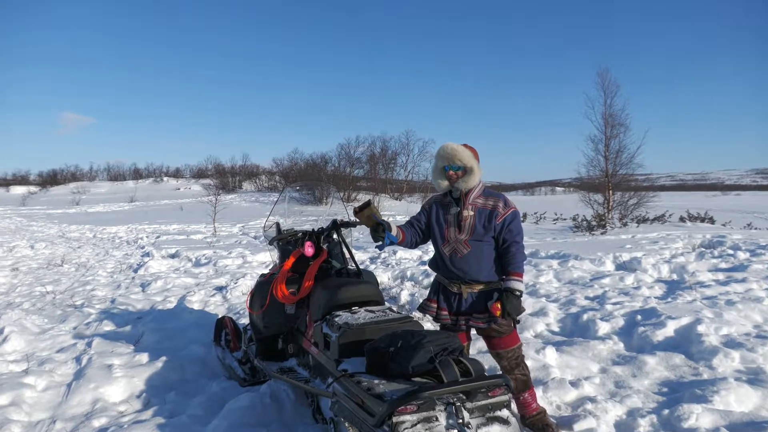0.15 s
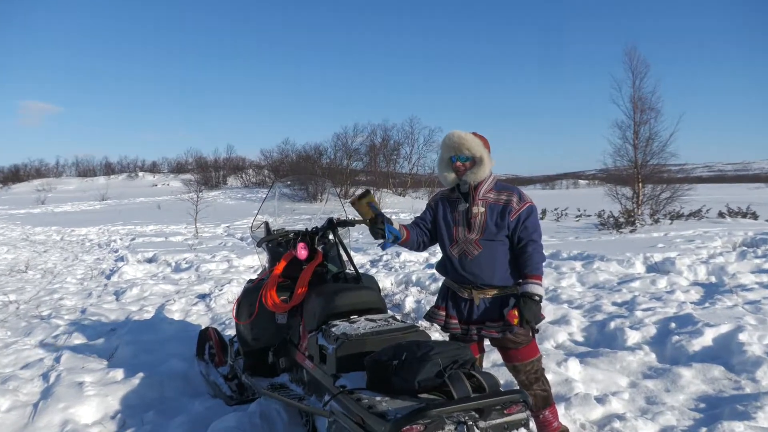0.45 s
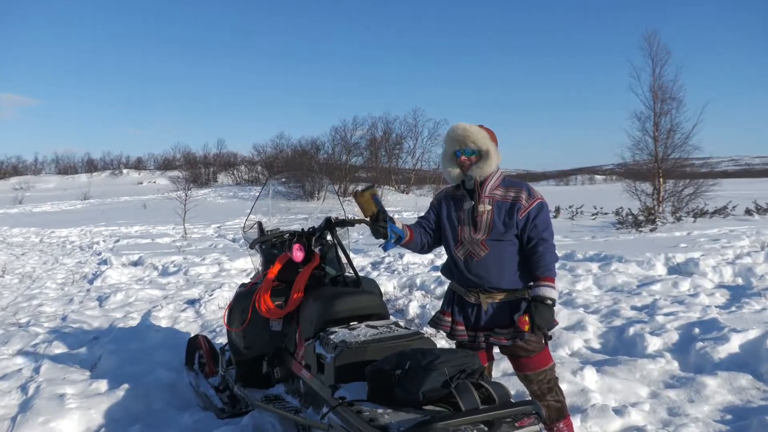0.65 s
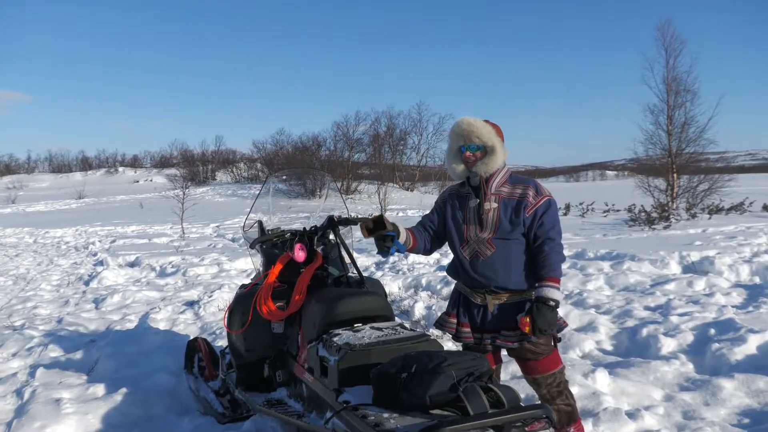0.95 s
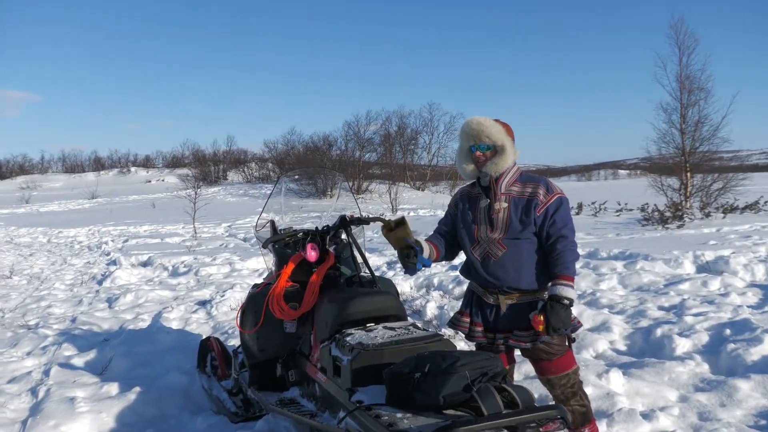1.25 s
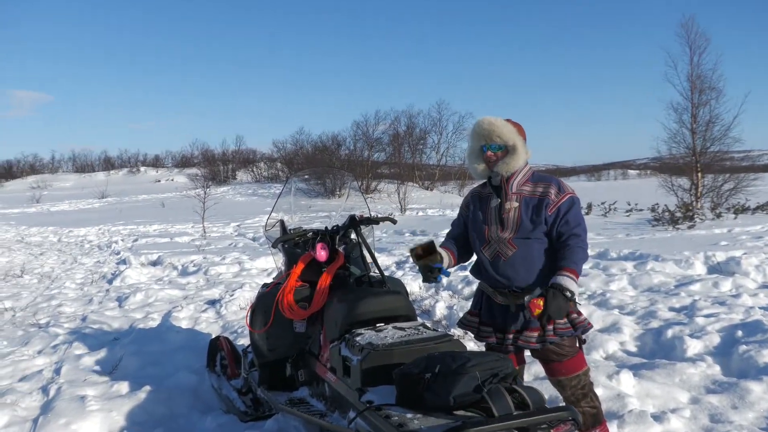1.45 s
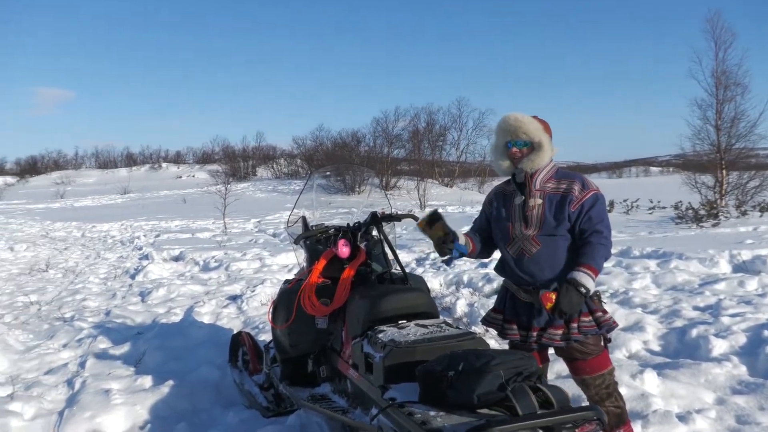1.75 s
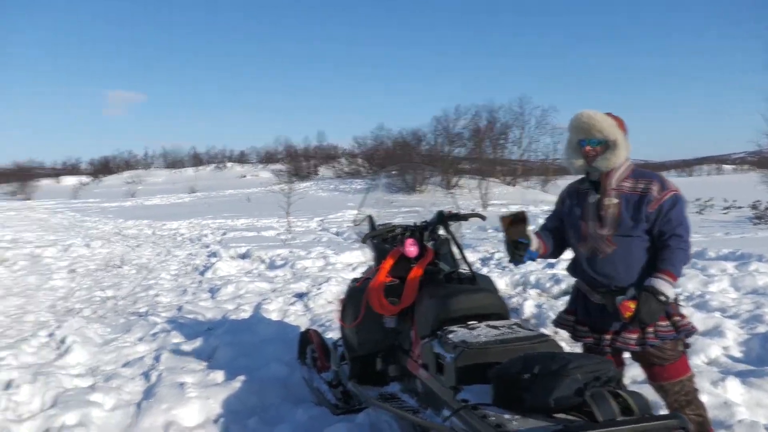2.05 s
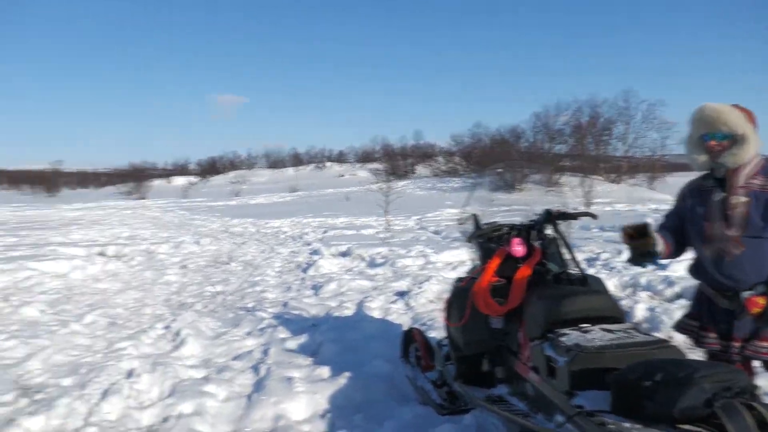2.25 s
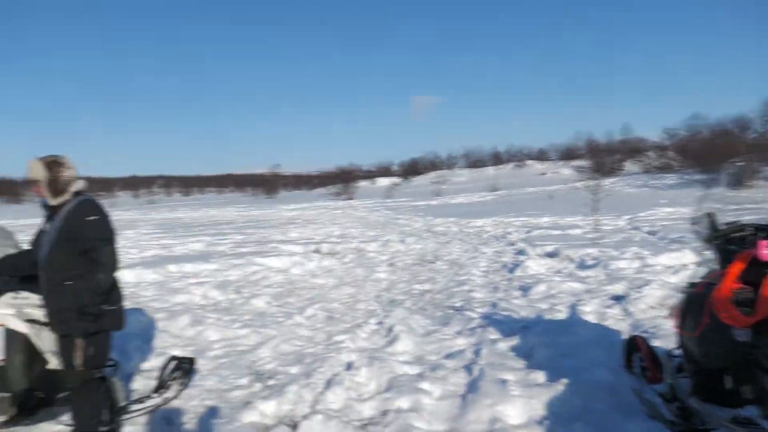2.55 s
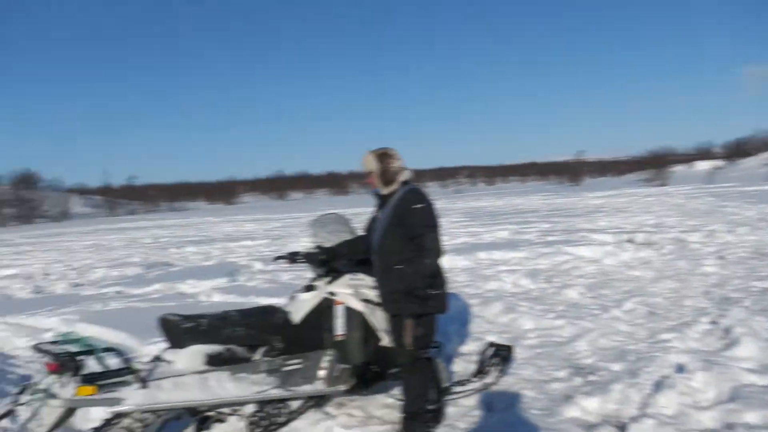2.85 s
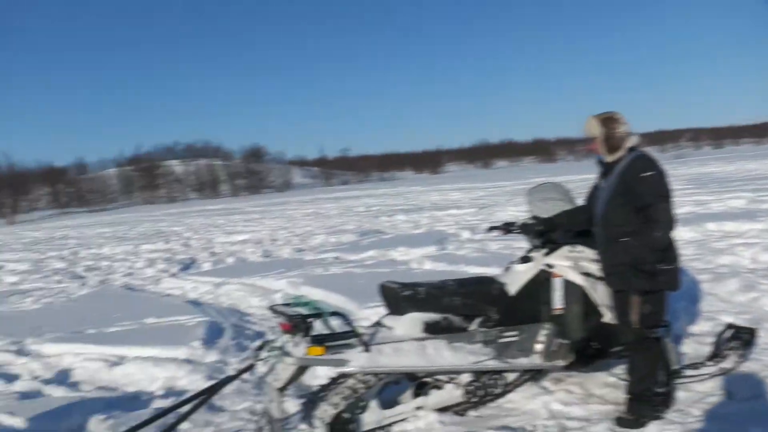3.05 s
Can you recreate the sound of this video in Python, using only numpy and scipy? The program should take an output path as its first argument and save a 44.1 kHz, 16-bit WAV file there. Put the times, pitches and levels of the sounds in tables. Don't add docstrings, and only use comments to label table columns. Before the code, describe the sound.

Close, dry, slightly flattened cowbell clanging runs steadily from the start at about ten or eleven strokes a second, thins near the end and stops dead, leaving faint outdoor air, microphone rumble and soft handling thuds.

```python
import sys
import numpy as np
from scipy import signal
from scipy.fft import rfft, irfft, next_fast_len
from scipy.io import wavfile
from scipy.ndimage import map_coordinates

SR = 44100
rng = np.random.default_rng(int(sys.argv[2]) if len(sys.argv) > 2 else 0)


def elevation(decibels):
    levels = np.asarray(decibels, float)
    return 10 ** (levels / 20)


def materialize(psi):
    bounded = np.clip(np.atleast_2d(psi).T, -1, 1)
    quanta = np.round(bounded * 32767).astype(np.int16)
    wavfile.write(sys.argv[1], SR, quanta)


N = 141120
NOW = np.arange(N) / SR

GLOVE_S, GLOVE_T60, GLOVE_LOW_T60 = 2.75, .14, .075
LEAD_S = .0014
LOW_DB = -5.5


def unit(x):
    return x / np.sqrt(np.mean(x ** 2) + 1e-20)


def along(points, hz):
    f, v = np.transpose(points)
    return np.interp(np.log(hz + 1), np.log(f + 1), v)


def coloured(points):
    m = next_fast_len(N + 8192)
    spectrum = rfft(rng.standard_normal(m)) * elevation(along(points, np.fft.rfftfreq(m, 1 / SR)))
    return unit(irfft(spectrum, m)[:N])


def wobble(rate):
    knots = rng.standard_normal(int(N * rate / SR) + 4)
    return map_coordinates(knots, [np.arange(N) * rate / SR])


# frequency in Hz, level in dB per Hz.
BREEZE = [(30, -24), (150, -10.5), (350, -9), (700, -4), (2750, -17), (5900, -29.5), (16000, -52)]


def breeze():
    gust_db, flutter_db = 1.5 * wobble(2.6), 2.5 * wobble(23.3)
    hiss = elevation(-79) * rng.standard_normal(N)
    return elevation(-64 + gust_db + flutter_db) * coloured(BREEZE) + hiss


def moving_microphone():
    start_s, rise_s = 2.52, .036
    moving = (1 + np.tanh((NOW - start_s) / rise_s)) / 2
    rumble = coloured([(25, -32), (70, -2.5), (200, 4), (450, -12), (900, -44)])
    return elevation(-64 + 1.7 * wobble(5.9)) * moving * rumble


def glove_rustle():
    centre_s, width_s = 2.855, .023
    rub = np.exp(-.5 * ((NOW - centre_s) / width_s) ** 2)
    cloth = coloured([(300, -4), (700, 2.5), (4500, -8), (9000, -30)])
    return elevation(-60 + 2.7 * wobble(100)) * rub * cloth


# start in seconds, level in dB, pitch in Hz, t60 in seconds.
KNOCKS = [
    (2.92, -43, 300, 0.053),
    (2.919, -51, 1000, 0.019),
    (3.084, -47, 127, 0.045),
    (3.141, -60, 1144, .02),
    (3.178, -39, 350, 0.022),
    (3.177, -53, 940, 0.023),
]


def knocks():
    out = np.zeros(N)
    for start_s, db, hz, t60 in KNOCKS:
        t = np.clip(NOW - start_s, 0, None)
        out += elevation(db - 60 * t / t60) * np.sin(2 * np.pi * hz * t)
    return out


# start in seconds, level in dB.
JOLTS = [(0.119, -41), (0.221, -70), (0.298, -44), (0.389, -32), (0.464, -37), (0.566, -50), (0.65, -62),
         (0.753, -37), (0.845, -70), (0.959, -38.5), (1.048, -53), (1.153, -33), (1.229, -51),
         (1.331, -39.5), (1.417, -58), (1.509, -63), (1.576, -60), (1.706, -50), (1.774, -62),
         (1.886, -28.5), (1.972, -56), (2.075, -37.5), (2.172, -66), (2.279, -67), (2.368, -39.5),
         (2.625, -64)]


def jolts():
    out, rise_s = np.zeros(N), .0009
    for start_s, db in [(.0005, -29)] + list(JOLTS):
        t = np.clip(NOW - start_s, 0, .2)
        out += elevation(db - 3.5) * t / rise_s * np.exp(1 - t / rise_s)
    return out


# low tone in dB, clang in dB, tick in dB.
FIRST_SLAM = (-7, -21.5, -30)
# start in seconds, low tone in dB, clang in dB, tick in dB.
SLAMS = [(0.121, -7, -17, -27.5), (0.224, -17, -10.5, -26.5), (0.301, -7, -18.5, -25.5),
         (0.39, -10.5, -17.5, -30), (0.468, -9, -15.5, -25.5), (0.57, -2, -18.5, -30),
         (0.652, -5, -17.5, -26), (0.755, -3.5, -18.5, -31), (0.847, -7.5, -17.5, -24.5),
         (0.959, -4.5, -20.5, -27), (1.051, -7, -18.5, -24), (1.153, -5, -21.5, -25.5),
         (1.229, -6.5, -24.5, -26), (1.334, -6, -23, -27), (1.422, -8.5, -20, -30), (1.511, -7, -21, -28.5),
         (1.58, -8, -22, -27), (1.707, -7, -23, -25.5), (1.778, -9, -16.5, -28), (1.887, -2, -19, -27.5),
         (1.975, -14.5, -17.5, -28), (2.076, -3.5, -22, -30), (2.175, -2.5, -24, -28),
         (2.28, -21, -16, -24.5), (2.372, -3, -21.5, -27.5), (2.462, -21, -24.5, -35),
         (2.63, -6, -17, -34.5)]
# start in seconds, low tone in dB, clang in dB, tick in dB.
REBOUNDS = [(0.011, -21, -21, -26.5), (0.081, -26.5, -17.5, -30.5), (0.143, -27, -21.5, -27),
            (0.239, -19.5, -27.5, -21), (0.423, -12, -45, -26), (0.438, -14, -15, -33),
            (0.611, -16.5, -20.5, -28), (0.676, -42, -13.5, -25), (0.778, -11, -26.5, -38.5),
            (0.869, -34, -34.5, -48), (0.979, -45, -17, -56), (1.097, -13, -21.5, -28),
            (1.196, -66, -19.5, -67), (1.272, -9, -19.5, -34.5), (1.465, -57, -37, -33.5),
            (1.626, -19.5, -20.5, -34), (1.799, -55, -18, -25), (1.92, -51, -50, -64),
            (2.015, -12, -12.5, -21.5), (2.039, -55, -45, -27.5), (2.122, -50, -23.5, -32),
            (2.268, -19.5, -17, -38), (2.309, -17, -39, -24), (2.413, -19.5, -29, -27),
            (2.561, -26, -25.5, -81), (2.594, -47, -36, -67), (2.659, -24, -40, -39),
            (2.688, -14.5, -24.5, -26), (0.277, -34, -13.5, -52), (0.321, -33, -33.5, -47),
            (0.453, -22, -24, -39), (0.525, -30, -18, -36.5), (0.805, -20.5, -22, -42),
            (1.121, -40.5, -19.5, -47), (1.249, -32, -41, -62), (1.294, -48.5, -22.5, -34.5),
            (1.834, -14.5, -15.5, -32), (2.152, -35, -23, -52), (2.345, -42.5, -26, -50),
            (2.489, -25, -21, -34.5), (2.521, -34, -35, -40), (2.541, -26, -28.5, -39),
            (0.92, -53, -29, -43), (1.38, -64, -23, -54), (1.55, -20.5, -36, -48), (1.74, -21, -24.5, -56),
            (2.22, -42.5, -28.5, -41)]


def clapper():
    slams = np.vstack([(-.0015, *FIRST_SLAM), SLAMS])
    per_s = 95
    count = int(per_s * GLOVE_S)
    jitter = np.tanh(rng.standard_normal(count)) / 2
    graze_s = (np.arange(count) + .5 + jitter) / per_s
    before = slams[np.searchsorted(slams[:, 0], graze_s) - 1]
    fade_db = 48 * (graze_s - before[:, 0])
    graze_db = before[:, 2] - 14.5 - fade_db + 3.5 * rng.standard_normal(count)
    grazes = np.column_stack([graze_s, graze_db - 14, graze_db, graze_db - 15.5])
    return slams, np.vstack([slams, REBOUNDS, grazes])


def ring(modes, times, strength_db, slam_s, swing, scatter_db=5, check_db=7.5, signs=(-1, 1),
         turn_db=4.5, lag=0, rise_s=.0006):
    now = NOW + LEAD_S
    heard = now + .032 / 343 * swing
    order = np.argsort(times)
    last = np.searchsorted(times[order], now, "right") - 1
    checked = check_db * np.searchsorted(slam_s, now, "right")
    checked_before = check_db * np.searchsorted(slam_s, times, "right")
    kick_heard = np.interp(times, now, heard)
    keep = np.exp(-1 / (SR * rise_s))
    out = np.zeros(N)
    for hz, db, t60 in modes:
        fall = 60 / max(t60, .045)
        kick_db = strength_db + db + scatter_db * np.tanh(rng.standard_normal(len(times)))
        kick = elevation(kick_db + fall * times + checked_before) * rng.choice(signs, len(times))
        kick = kick * np.exp(-2j * np.pi * hz * kick_heard - 1j * lag)
        state = elevation(-fall * now - checked) * np.cumsum(kick[order])[last]
        state = signal.lfilter([1 - keep], [1, -keep], state)
        knots = np.arange(1000) / (22 * hz / 1000)
        beam = np.interp(now, knots, elevation(turn_db * rng.standard_normal(len(knots))))
        out += beam * (state * np.exp(2j * np.pi * hz * heard)).imag
    return out


# pitch in Hz, level in dB, t60 in seconds.
MOUTH = [
    (656, -3, .07),
]
# pitch in Hz, level in dB, t60 in seconds.
HUM = [
    (684.6, 1, 0.26),
    (655.3, -11.5, 0.35),
]
HUM_LEVELS = [-20.5, -15, -17.5, -21.5, -11.5, -16.5, -15.5, -19.5, -18.5, -19, -14.5, -16, -14, -15, -14,
              -13, -15.5, -11.5, -14, -18, -15, -13.5, -15, -20, -15, -19.5, -15, -13]


def low_tone(slams, contacts, swing):
    low = dict(slam_s=slams[:, 0], swing=swing, scatter_db=0, check_db=24, signs=[1], turn_db=1.35)
    out = ring(MOUTH, slams[:, 0], slams[:, 1] + LOW_DB, rise_s=.0002, **low)
    hum_db = np.r_[HUM_LEVELS, contacts[len(slams):, 1] - 5] + LOW_DB
    return out + ring(HUM, contacts[:, 0], hum_db, lag=1.89, rise_s=.002, **low)


WALL_HZ = [1078, 1274, 1350, 1608, 1865, 1896, 1945, 1982, 2110, 2387, 2743, 2915, 2983, 3436]
# level in dB, t60 in seconds, dB gained as the mouth turns away.
WALLS = [(-18.5, 0.55, -8.5), (-10.5, 0.75, 2.5), (-20, 0.042, -18.5), (-16, 1, 5.5), (-6.5, 0.15, 5.5),
         (-4, 0.11, 6.5), (-7.5, 0.18, -3.5), (-9.5, 0.46, 4), (-26, 0.34, -4.5), (-9, 0.2, -2),
         (-17, 1, 1.5), (-8.5, 0.32, 1.9), (-16, 0.83, 1.7), (-12, 0.15, 3.3)]
# time in seconds, amount turned away (negative is towards,
# positive is away).
FACING = [(0, -0.59), (.4, -0.74), (.8, -1.1), (1.2, -0.37), (1.6, -0.041), (2, -0.11), (2.4, 1.2),
          (2.8, 0.26)]


def walls(slams, contacts, swing):
    away = np.interp(contacts[:, 0], *np.transpose(FACING))
    modes = [(hz, db + turn * away, t60) for hz, (db, t60, turn) in zip(WALL_HZ, WALLS)]
    return ring(modes, contacts[:, 0], contacts[:, 2] - 14, slams[:, 0], swing)


RIM_HZ = [3940, 4045, 4220, 4548, 4880, 5124, 5447, 5727, 5964, 6340, 6718, 7041, 7472, 7708]
# level in dB, t60 in seconds.
RIM = [(-16.5, 0.75), (-25.5, .3), (-10.5, 0.32), (-21, 0.6), (-5, 0.14), (-6.5, 0.097), (-24, .15),
       (-20, 0.29), (-28, 0.44), (-21.5, 0.46), (-13.5, 0.11), (-18, 0.28), (-12.5, 0.15), (-20.5, 0.059)]
SEAM_HZ = [7902, 8225, 8505, 8871, 9259, 9582, 9926, 10185, 10615, 10981, 11304, 11649, 12037, 12575]
# level in dB, t60 in seconds.
SEAM = [(-16, 0.05), (-15.5, 0.066), (-17.5, 0.16), (-15.5, 0.088), (-32.5, 0.23), (-24, 0.13),
        (-38.5, 0.06), (-29.5, 0.16), (-37, 0.2), (-29.5, .1), (-29.5, .1), (-19.5, 0.072), (-25.5, .1),
        (-33.5, .09)]


def rim_and_seam(slams, contacts, swing):
    modes = np.column_stack([list(RIM_HZ) + list(SEAM_HZ), list(RIM) + list(SEAM)])
    return ring(modes, contacts[:, 0], contacts[:, 3] - 9, slams[:, 0], swing)


# frequency in Hz, level in dB.
PLATE = [(900, -20), (1900, -6), (3000, -9.5), (6000, -19), (9000, -24), (15500, -32)]


def small_plate_modes(slams, contacts, swing):
    hz = 1300 + 14200 * ((np.arange(40) + rng.random(40)) / 40) ** 1.6
    t60 = .072 * (hz / 2000) ** -.17
    modes = np.column_stack([hz, along(PLATE, hz), t60])
    strength_db = (contacts[:, 2] + contacts[:, 3]) / 2 - 13
    return ring(modes, contacts[:, 0], strength_db, slams[:, 0], swing)


# frequency in Hz, level in dB per Hz.
CRACK = [(300, -43), (900, 16), (2000, -1), (5000, 7.5), (9000, 1.5), (13000, -11.5), (16000, -26)]


def impacts(slams):
    crack = coloured(CRACK)
    thud = coloured([(500, 7.5), (1000, 1.5), (2200, 8.5), (4000, -7.5), (8000, -21.5)])
    out = np.zeros(N)
    for start_s, low_db, clang_db, tick_db in slams:
        t = np.clip(NOW - start_s + LEAD_S, 0, .2)
        burst = elevation(tick_db + 8 - 60 * t / .014) * crack
        burst += elevation(clang_db - 1 - 60 * t / .019) * thud
        clank = elevation(low_db + LOW_DB - 13 - 60 * t / .018) * np.sin(2 * np.pi * 855 * t)
        out += np.tanh(t / .0002) * burst - clank
    return out


def bell():
    slams, contacts = clapper()
    swing = wobble(10)
    metal = walls(slams, contacts, swing)
    metal += rim_and_seam(slams, contacts, swing)
    metal += small_plate_modes(slams, contacts, swing)
    gloved_s = np.clip(NOW - GLOVE_S, 0, None)
    out = low_tone(slams, contacts, swing) * elevation(-60 * gloved_s / GLOVE_LOW_T60)
    out += metal * elevation(-60 * gloved_s / GLOVE_T60)
    out += impacts(slams)
    radiation = signal.butter(4, 540, "high", fs=SR, output="sos")
    return signal.sosfilt(radiation, out) + jolts()


def scene():
    field = breeze() + moving_microphone() + glove_rustle() + knocks()
    return (field + bell())[None]


def low_pass(x):
    return signal.sosfilt(signal.butter(12, 16530, fs=SR, output="sos"), x)


def record(dry):
    top, duck_db, duck_s = .235, 5, .02
    over = np.clip(np.abs(dry) / top, 0, 2) ** 2
    keep = np.exp(-1 / (SR * duck_s))
    x = dry * elevation(-duck_db * signal.lfilter([1 - keep], [1, -keep], over))
    x = x / (1 + np.abs(x / top) ** 8) ** (1 / 8)
    x = signal.sosfilt(signal.butter(1, 60, "high", fs=SR, output="sos"), x)
    treble_db = np.interp(np.fft.rfftfreq(N, 1 / SR), [15500, 16450, 16500], [0, -13, -60])
    x = irfft(rfft(x) * elevation(treble_db), N)
    return low_pass(x)


dry = scene()
out = record(dry)
materialize(out)
```